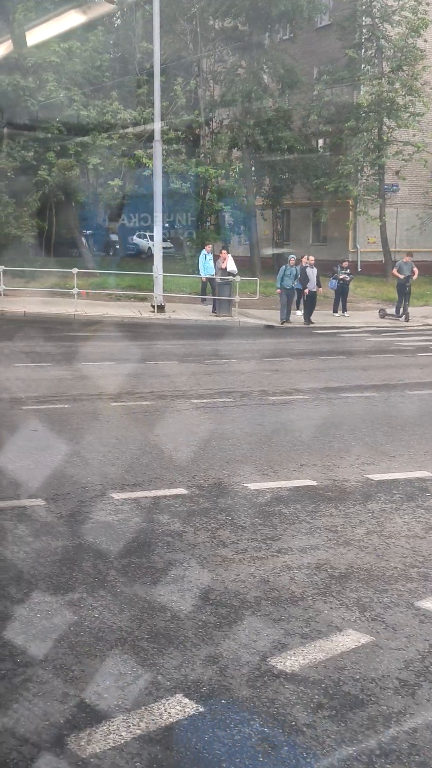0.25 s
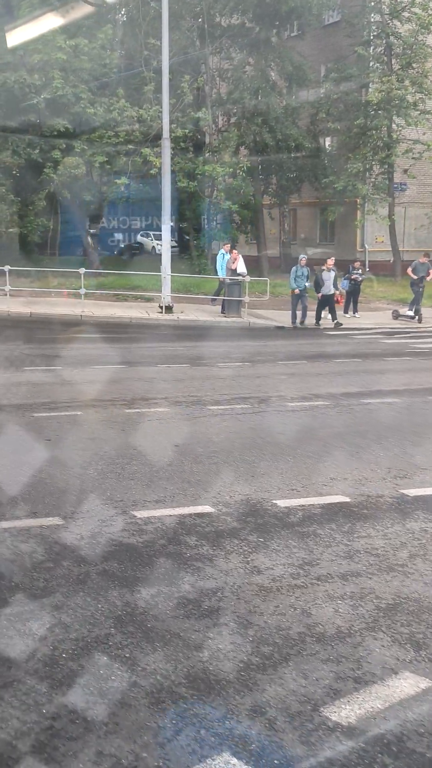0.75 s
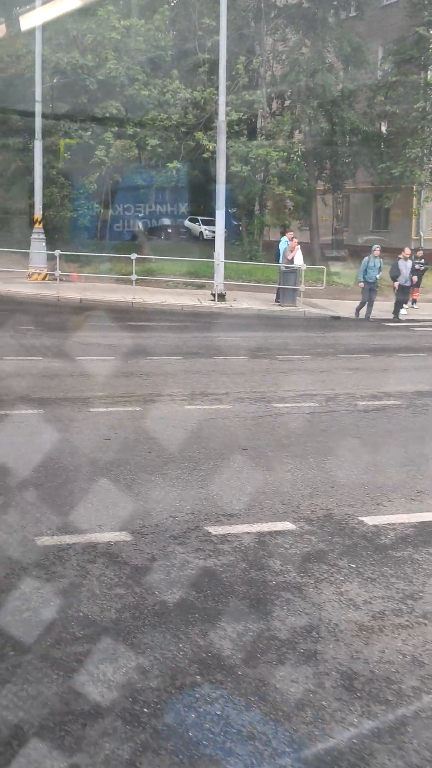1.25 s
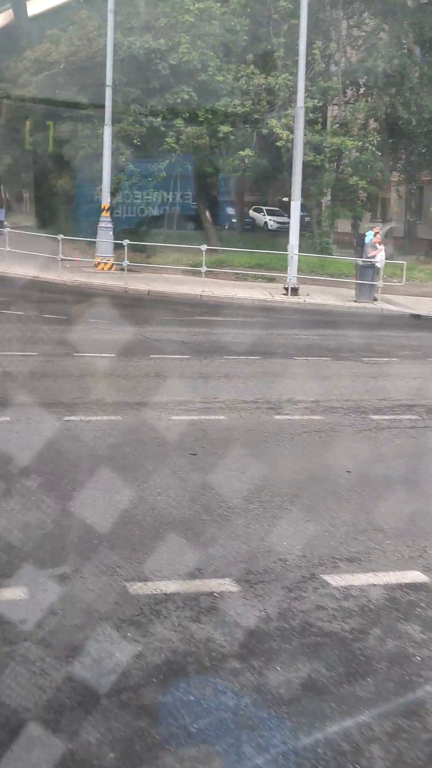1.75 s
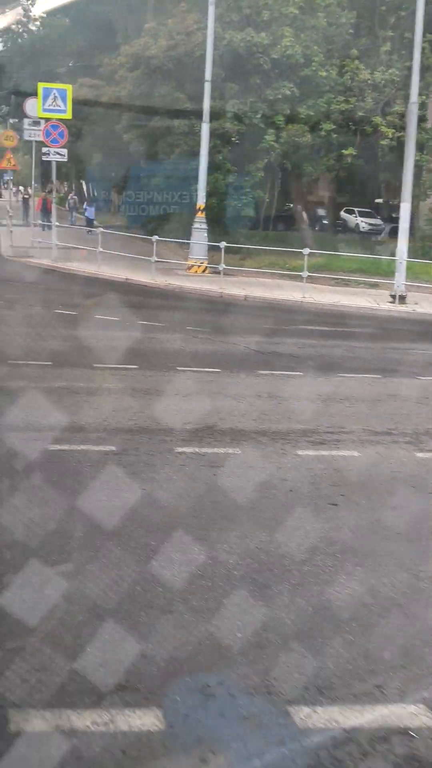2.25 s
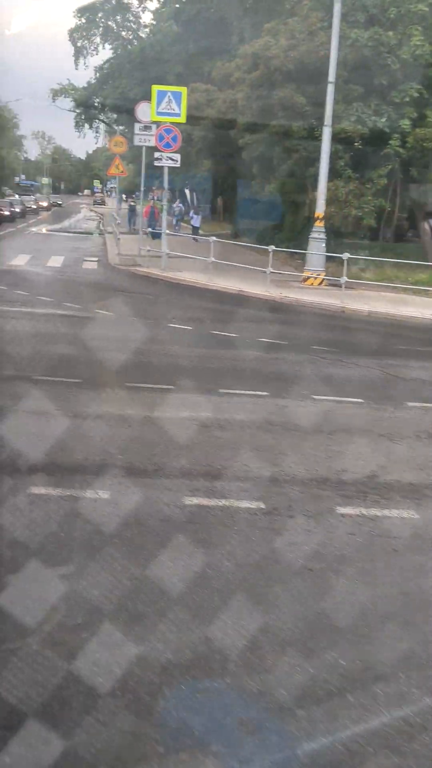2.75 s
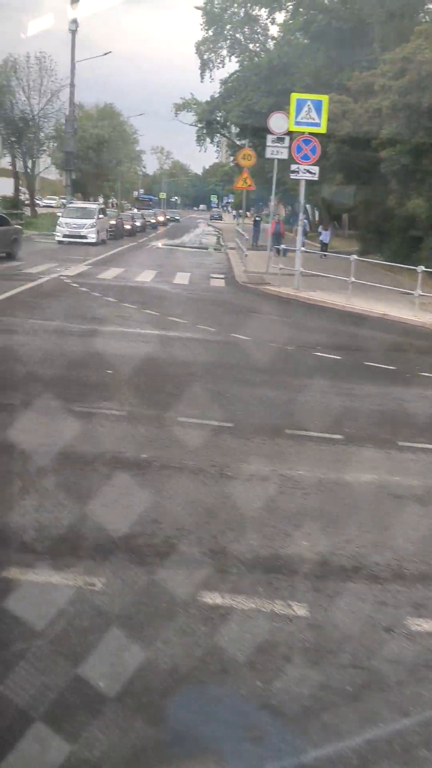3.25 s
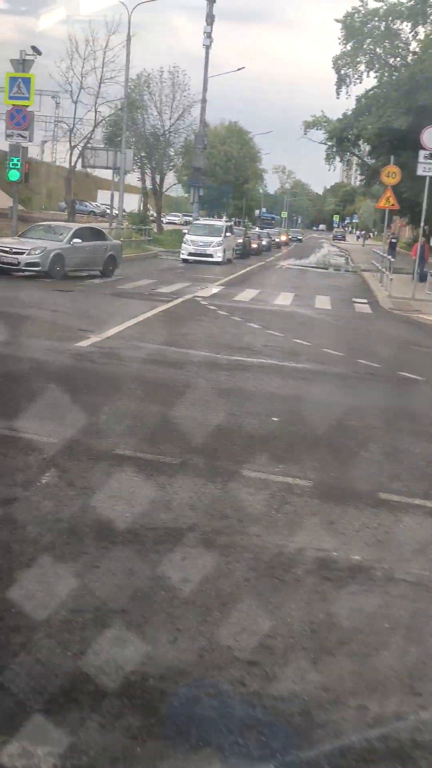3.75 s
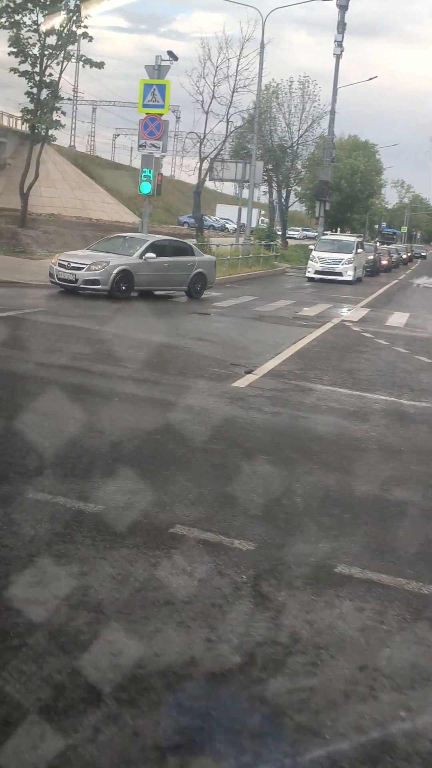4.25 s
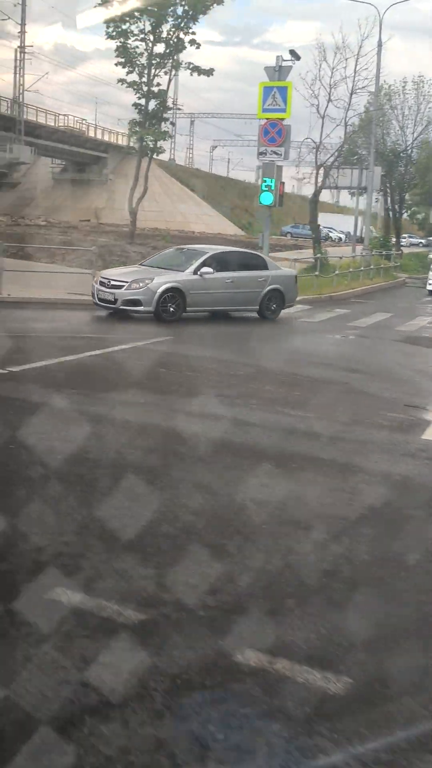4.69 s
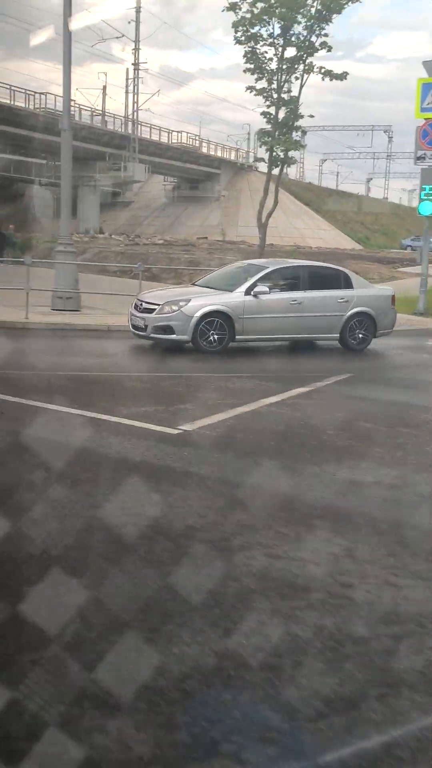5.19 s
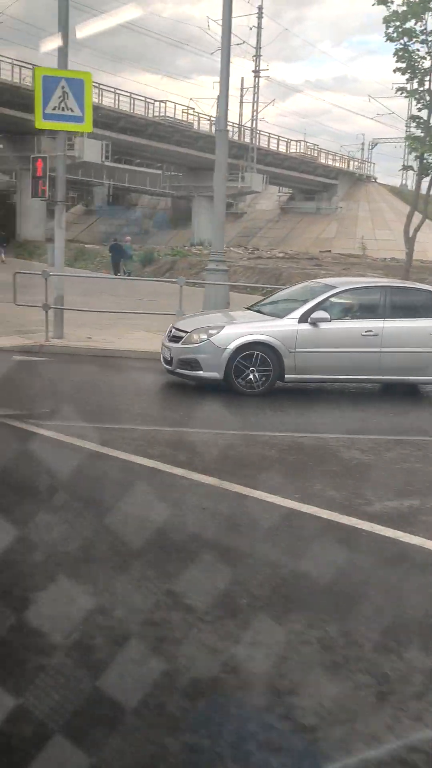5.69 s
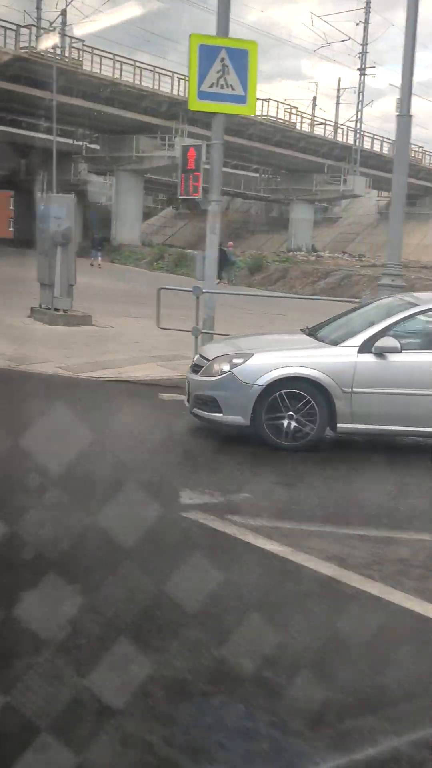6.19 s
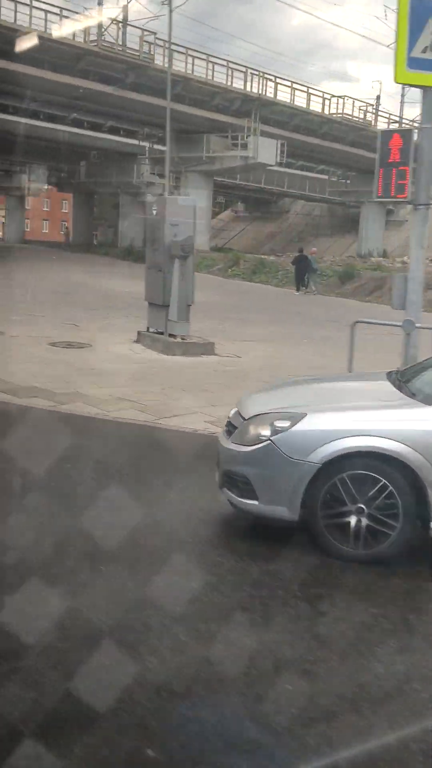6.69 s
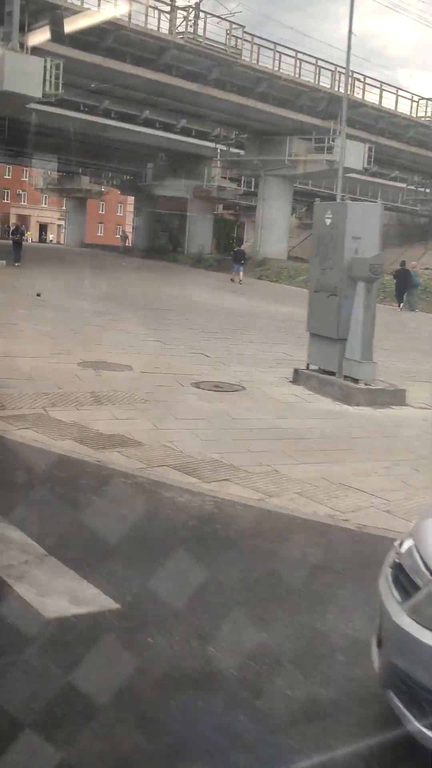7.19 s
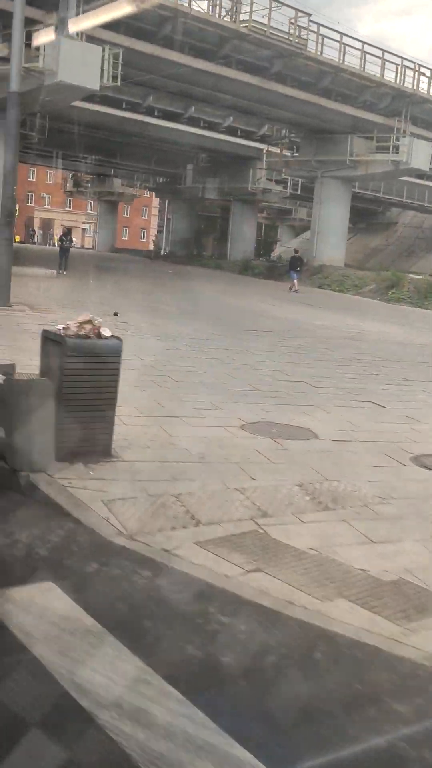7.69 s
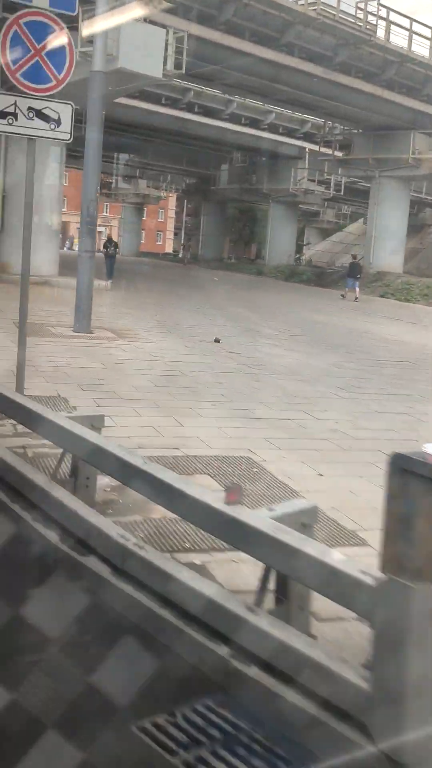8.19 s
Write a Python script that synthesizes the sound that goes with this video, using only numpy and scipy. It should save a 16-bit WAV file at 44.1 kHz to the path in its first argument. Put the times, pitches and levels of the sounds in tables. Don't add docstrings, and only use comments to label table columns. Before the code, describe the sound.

A bus diesel takes load with a soft thud and pulls away, its drone rising and falling over hiss, fan whine and trim buzz.

```python
import sys
import numpy as np
from scipy import signal
from scipy.io import wavfile
from scipy.ndimage import uniform_filter1d

SR = 44100
rng = np.random.default_rng(int(sys.argv[2]) if len(sys.argv) > 2 else 0)


def store_pcm(level_fs):
    pcm = np.round(np.clip(level_fs, -1, 1) * 32767).astype(np.int16)
    wavfile.write(sys.argv[1], SR, np.atleast_2d(pcm).T)


def natural_amplitude(level_db):
    exponent = np.asarray(level_db, float) / 20
    return 10 ** exponent


N = 372204
T = np.arange(N) / SR
MESH, CYLINDERS = 27, 6
TAKE_UP_S = .65

# (time [s], frequency [Hz])
MESH_PITCH = [(.62, 157.3), (.78, 196), (1.1, 235), (1.4, 240), (1.82, 277), (2.1, 278.5), (2.58, 312.5),
              (3.07, 317), (3.52, 341), (3.88, 344.5), (4.4, 333), (4.9, 285.5), (5.5, 286), (6.05, 314),
              (6.6, 337.5), (7.0, 318), (7.45, 284.5), (8.3, 311.5)]
# (time [s], level [dB])
ENGINE_LOAD = [(.62, -36), (.72, -33.5), (1.1, -32.5), (1.6, -30), (2.2, -29), (2.64, -29), (3.2, -32.5),
               (3.53, -31.5), (4.1, -33), (4.74, -31.5), (5.09, -27.5), (5.5, -29.5), (6.29, -29),
               (6.37, -34.5), (6.97, -32), (7.1, -31), (7.9, -28.5), (8.4, -29.5)]


def evened(x):
    return x / np.sqrt(np.mean(x ** 2) + 1e-20)


def read(points, hz):
    f, value = np.transpose(points)
    return np.interp(np.log(hz + 1), np.log(f + 1), value)


def curve(table, column, t=T):
    columns = np.transpose(table)
    return np.interp(t, columns[0], columns[column])


def ramp(t, start, length):
    return np.clip((t - start) / length, 0, 1)


def drift(t, top_hz):
    f = np.geomspace(top_hz / 10, top_hz, num=8)[:, None]
    knots = np.linspace(0, N / SR, num=2000)
    waves = np.sin(2 * np.pi * (f * knots + rng.random(f.shape))) / np.sqrt(f)
    return np.interp(t, knots, evened(waves.sum(0)))


def resonate(x, hz, width):
    return signal.lfilter(*signal.iirpeak(hz, hz / width, SR), x)


def noise(gain, patchy_db):
    frames, hz = N // 512 + 5, np.fft.rfftfreq(2048, 1 / SR)
    a, b, c, d, patches = rng.standard_normal((frames, 1025, 5)).T
    patches = uniform_filter1d(patches, size=20, axis=0)
    patches = evened(uniform_filter1d(patches, size=7, axis=1))
    z = np.array([a + 1j * b, c + 1j * d]) * gain(hz) * natural_amplitude(patchy_db * patches)
    return evened(signal.istft(z, nperseg=2048, noverlap=1536)[1][:, :N])


def left_right(x):
    return np.array([x[0] + x[1], x[0] - x[1]])


def ports(points):
    # (frequency [Hz], correlation [-1 to 1])
    likeness = [(1000, -0.16), (1400, -0.32), (2200, 0.021), (3100, -0.017), (6800, -0.038), (15000, -0.07)]

    def gain(hz):
        same = np.clip(read(likeness, hz), -1, 1)
        return (natural_amplitude(read(points, hz)) * np.sqrt([1 + same, 1 - same]))[..., None]
    return gain


def cabin(hz, cut_hz=62):
    # (frequency [Hz], width [Hz], level [dB])
    modes = [(67.6, 2.7, -15.5), (75.1, 3.9, -10), (88.2, 16, -15.5), (126.8, 11, -4), (143.6, 17, -0.5),
             (161, 13, -4.5), (181, 23, -9), (219.1, 10.7, 2.5), (230.1, 16.3, -1), (284, 12.8, -12.5),
             (310, 20.2, -16), (380.4, 29.6, -17), (424.2, 17, -18), (473.5, 5.8, -24), (485, 28.5, -23.5),
             (570, 55, -25), (626.6, 53, -25), (705, 53, -36.5), (758, 8.8, -25.5), (838, 18, -33)]
    power = sum(natural_amplitude(db) ** 2 / (1 + (2 * (hz - f) / w) ** 2) ** 1.71 for f, w, db in modes)
    return np.sqrt(power / (1 + (cut_hz / (hz + 1)) ** 12))


def seat(hz):
    # (frequency [Hz], level [dB])
    side = [(50, -29), (100, -22.5), (128, -11), (145, -21), (200, -3), (225, -23), (258, -4), (310, -12),
            (345, -1.5), (420, -4.5), (500, -3), (1000, -13)]
    upper = np.clip((hz - 300) / 60, 0, 1)
    split = np.sqrt([1 - upper, upper])[:, None]
    return cabin(hz) * split * np.array([np.ones(len(hz)), natural_amplitude(read(side, hz))])


def load(t=T):
    return curve(ENGINE_LOAD, 1, t) + 31


def pace():
    return 1 - np.exp(-np.maximum(T - TAKE_UP_S, 0) / 2.53)


def rush_db():
    hiss_db = -49 + 0.46 * load() - 4 * (1 - ramp(T, TAKE_UP_S, 0.14))
    air_db = -65 + 0.92 * load() + 5.5 * pace()
    return hiss_db, air_db


def engine():
    order_db = [-11.5, 13.5, 1.5, -11, 10, 4.5, 0, 9, -2.5, 5, -2.5, -23, 4.5, 6, 2, 7, 1, 4.5, -6.5, 10,
                -13, -17, 13.5, 7.5, -4, 3]
    high_orders = [32, 33, 36, 38, 42, 44, 48, 50, 54, 60, 66, 72, 81]
    high_db = [2, 1, 4, 4, 3, 2, 8, 3, 7.5, 2, 2, 12, 5]
    # (time [s], length [s], level [dB])
    sing = [
        (1.291, 0.17, 8.5),
        (1.94, 0.27, 13),
        (2.788, 0.57, 6),
        (4.601, .15, 5),
        (6.106, 0.46, 5.5),
        (6.946, .2, 6.5),
        (8.093, 0.35, 2),
    ]
    rest_db, wander_db, wander_turns = -6, 1.8, .03
    step = 16
    t = T[::step]
    cycle_hz = uniform_filter1d(curve(MESH_PITCH, 1, t), size=250) / MESH
    turns = np.cumsum(cycle_hz) * step / SR
    strength = dict(enumerate(order_db, start=5)) | dict(zip(high_orders, high_db))
    running = ramp(t, TAKE_UP_S, .06)
    firing_db = running * (-1.5 - 0.85 * np.maximum(load(t), -2.5))
    firing_db = firing_db - 6 * np.clip((8.5 - cycle_hz) / 2, 0, 1)
    mesh_db = 6 - 9.5 * running
    mesh_db = mesh_db + sum(db * np.exp(-((t - s) / w) ** 2) for s, w, db in sing)
    third_mesh_db = -12 * np.clip(10 - cycle_hz, 0, 1) + .8 * mesh_db
    gains = seat(np.arange(1200.))
    lines = 0
    for k in range(5, 85):
        db = strength.get(k, rest_db) + (k % CYLINDERS == 0) * firing_db
        db = db + (k % MESH == 0) * mesh_db * MESH / k + (k == 3 * MESH) * third_mesh_db
        db = db - 10 * (k > 2 * MESH) * (1 - running)
        db = db + wander_db * (k != MESH) * (1 + k / 70) * drift(t, 2)
        angle = 2 * np.pi * (k * turns + wander_turns * drift(t, 4) + rng.random((2, 1)))
        mode_gain = gains[..., np.round(k * cycle_hz).astype(int)]
        lines = lines + natural_amplitude(db) * mode_gain * np.cos(angle)
    lines = signal.resample_poly(lines, step, 1, axis=2)[..., :N]
    boom_db = -26 + 5.5 * ramp(T, TAKE_UP_S, 0.067) + 7 * ramp(T, TAKE_UP_S, 2.46)
    boom_db = boom_db + 0.58 * np.clip(load(), -2, 4)
    levels_db, scatter_db = (boom_db, curve(ENGINE_LOAD, 1)), (-10, -3.5)
    out = 0
    for part in (0, 1):
        scatter = noise(lambda hz: seat(hz)[part][..., None], 1)
        body = evened(lines[part]) + natural_amplitude(scatter_db[part]) * scatter
        out = out + natural_amplitude(levels_db[part] - 4.0) * body
    return left_right(out)


def rumble(level_db=-50):
    def colour(hz):
        return (np.exp(-((hz - 50) / 16) ** 2) * np.array([[1], [.18]]))[..., None]
    return left_right(noise(colour, 6.5)) * natural_amplitude(level_db + .5 * (rush_db()[0] + 30.5))


def roar(level_db=-11):
    # (frequency [Hz], density [dB per Hz])
    roar_colour = [(440, -32), (750, -1.5), (845, 1), (1170, -7.5), (1390, -7.5), (1540, -14), (2000, -19),
                   (2600, -45.5), (4400, -120)]
    return left_right(noise(ports(roar_colour), 1.0)) * natural_amplitude(level_db + curve(ENGINE_LOAD, 1))


def hiss(low_db=1.0, top_db=0, bright_hz=5200):
    # (frequency [Hz], density [dB per Hz])
    hiss_colour = [(710, -22.5), (1200, -6), (1780, -9.5), (2080, -5), (3120, -8.5), (3960, -8.5),
                   (4300, -9), (4410, -6.5), (8600, -12), (11200, -59), (18900, -120)]
    # (frequency [Hz], density [dB per Hz])
    air_colour = [(5180, -29), (8800, -10.5), (9060, 1.5), (10900, 3.5), (12800, -1.5), (15100, 1.5),
                  (15700, -4)]
    firing_turns = np.cumsum(curve(MESH_PITCH, 1)) * CYLINDERS / MESH / SR
    firing = 1 + .15 * np.cos(2 * np.pi * firing_turns)
    low = left_right(noise(ports(hiss_colour), 0.89))
    top = left_right(noise(ports(air_colour), 1.0))
    high_pass = signal.butter(2, bright_hz, "high", fs=SR, output="sos")
    treble = signal.sosfiltfilt(high_pass, low)
    hiss_db, air_db = rush_db()
    low = low + (natural_amplitude(1.2 * (air_db - hiss_db + 9.0)) - 1) * treble
    top = top * natural_amplitude([[1.1], [-1.1]])
    flicker = natural_amplitude(.5 * drift(T, 25.))
    return flicker * (low * firing * natural_amplitude(low_db + hiss_db) + top * natural_amplitude(top_db + air_db))


def panels(ticks_per_s=2500, spread_db=-1.0):
    # (frequency [Hz], width [Hz], level over the hiss [dB], share of the buzz [1])
    panel_modes = [(2470, 1500, -3.5, 0.23), (3433, 190, -2, 0.74), (3613, 130, -5.5, 2.2),
                   (5750, 180, -8.5, .3), (6270, 520, -4.5, 1.1), (8286, 190, -9.5, 0.39)]
    size = natural_amplitude(spread_db * np.minimum(rng.exponential(1, N), 4))
    ticks = (rng.random((2, N)) < ticks_per_s / SR) * rng.standard_normal((2, N)) * size
    buzz_db = -17.5 + 19 * pace()
    out = 0
    for hz, width, db, share in panel_modes:
        ring = evened(resonate(resonate(ticks, hz, width), hz, width))
        out = out + natural_amplitude(db + share * buzz_db + drift(T, 20)) * ring
    return natural_amplitude(rush_db()[0]) * out


def fan(second_db=-11, fourth_db=-13, right_turns=0.034):
    fan_orders = [1, 2, 3, 4, 5, 6, 8, 10, 12]
    fan_db = [-40, -48, -52, -48, -45, -57, -59, -63, -68]
    # (time [s], level [dB])
    fan_fade = [(0, 1), (.62, 0), (.7, -8), (8.44, -12)]
    # (time [s], dip [Hz], lasting drop [Hz])
    sags = [
        (.67, 23, 0),
        (3.45, 12, 0),
        (3.85, 0, 9),
        (4.2, 16, 1),
    ]
    fan_hz, whine_hz = 139.95, 4183
    blades = 0
    for k, db in zip(fan_orders, fan_db):
        blades = blades + natural_amplitude(db + 3) * np.cos(2 * np.pi * (k * fan_hz * T + rng.random((2, 1)) * k / 12))
    sag = 0
    for s, dip, drop in sags:
        sag = sag + dip * np.exp(-((T - s) / .08) ** 2) + drop * ramp(T, s - .25, .5)
    slot = np.cumsum(whine_hz - sag + 2 * drift(T, 20)) / SR / 3 + np.array([[0], [right_turns]])
    whine = np.cos(6 * np.pi * slot)
    whine = whine + natural_amplitude(second_db) * np.cos(4 * np.pi * slot) + natural_amplitude(fourth_db) * np.cos(8 * np.pi * slot)
    whine_db = -53 - .15 * sag + 1 + .5 * drift(T, 8)
    whine_db = whine_db + (.4 * load() + 1.5 * drift(T, 12) - 1) * ramp(T, 3.3, 3)
    return natural_amplitude(curve(fan_fade, 1)) * blades + natural_amplitude(whine_db) * whine


def driveline():
    # (time [s], level [dB], frequency [Hz], t60 [s])
    take_up = (.665, -17, 75, .55)
    s, db, hz, t60 = take_up
    late = np.maximum(T - s, 0)
    swell = (1 - np.exp(-late / 0.042)) ** 2
    return natural_amplitude(db - 60 * late / t60) * swell * np.sin(2 * np.pi * hz * late)


def valves(left_db=-1.0):
    # (time [s], level [dB], centre [Hz], width [Hz], t60 [s])
    puffs = [
        (1.422, -43.5, 4500, 1480, 0.35),
        (1.426, -52, 7800, 600, .1),
        (3.291, -48, 11000, 9000, .1),
        (4.603, -43, 7500, 12000, .08),
        (4.82, -58, 12300, 6700, 0.13),
        (.67, -56, 5540, 300, 0.5),
        (6.30, -43, 3480, 4030, 0.1),
        (6.94, -52, 12950, 5740, .17),
    ]
    hold_share, snap_db = .1, 4
    out, t = np.zeros((2, N)), np.arange(SR // 2) / SR
    for s, db, hz, width, t60 in puffs:
        burst = rng.standard_normal((2, len(t)))
        air = evened(resonate(resonate(burst, hz, width), hz, width))
        tail_db = -60 * np.maximum(t / t60 - hold_share, 0)
        shape = np.clip(t / .001, 0, 1) * natural_amplitude(db + snap_db * np.exp(-t / 0.0034) + tail_db)
        at = round(s * SR)
        out[:, at:at + len(t)] += air * shape
    return out * natural_amplitude([[left_db], [-left_db]])


def axle(right_turns=0.05):
    # (time [s], frequency [Hz])
    tooth_pitch = [(2.3, 396), (2.6, 416), (3, 423), (3.6, 455), (4.1, 459), (5.2, 447), (6.8, 471),
                   (7.4, 466), (8.44, 482)]
    angle = 2 * np.pi * (np.cumsum(curve(tooth_pitch, 1)) / SR + np.array([[0], [right_turns]]))
    early = 1 - ramp(T, 4.2, .4)
    tone_db = -38 + 1.5 * load() + 5.1 * early + 1.95 * drift(T, 9)
    octave_db = -45 - 18 * (1.5 - early)
    tones = natural_amplitude(tone_db) * np.cos(angle) + natural_amplitude(octave_db) * np.cos(2 * angle)
    return ramp(T, tooth_pitch[0][0], .35) ** 2 * np.sqrt(2) * tones


def scene():
    body = engine() + rumble() + roar() + hiss() + panels()
    return body + fan() + driveline() + valves() + axle()


def top_cut(x):
    return signal.sosfilt(signal.butter(12, 16810, fs=SR, output="sos"), x)


def record(dry):
    limited = 1.336 * np.tanh(dry / 1.088)
    low_pass = signal.firwin(2047, 15785, window=("kaiser", 9), fs=SR)
    limited = signal.oaconvolve(limited, low_pass[None], "same")
    return top_cut(limited)


dry = scene()
out = record(dry)
store_pcm(out)
```